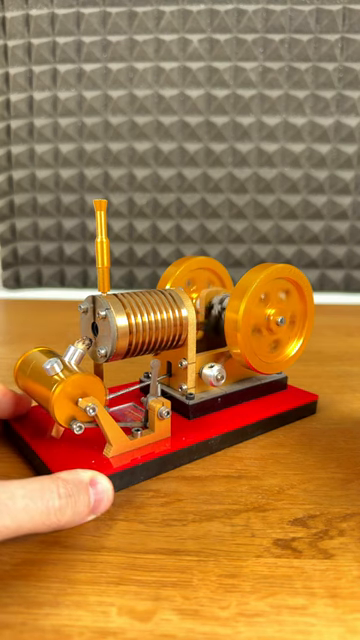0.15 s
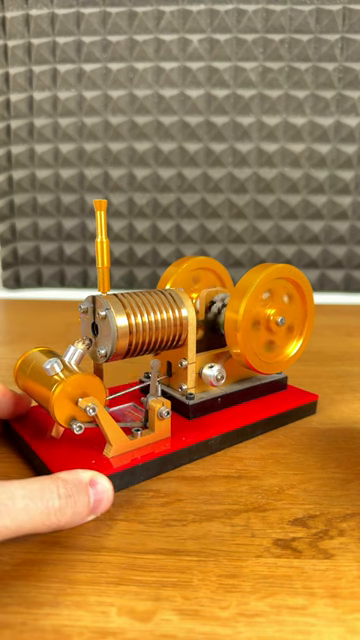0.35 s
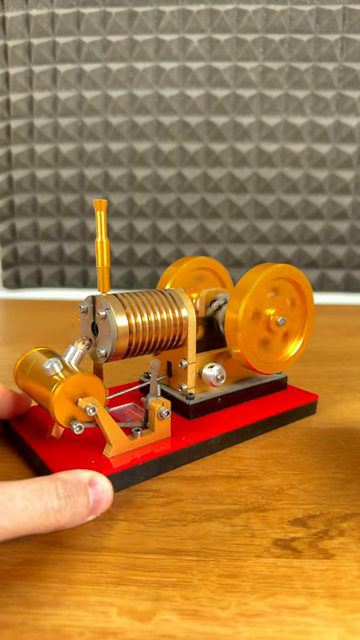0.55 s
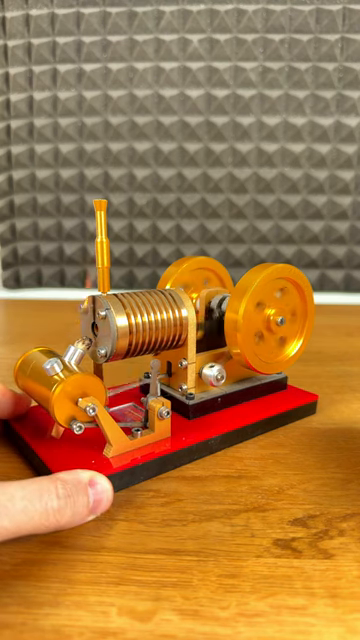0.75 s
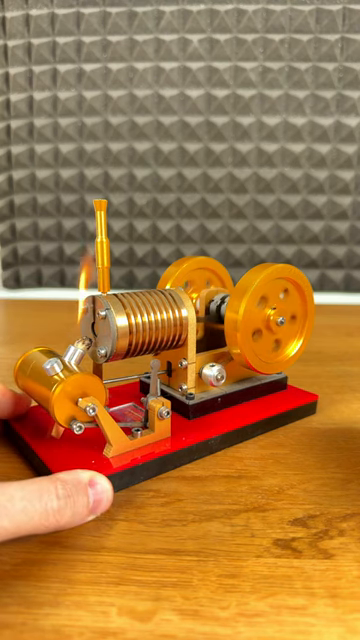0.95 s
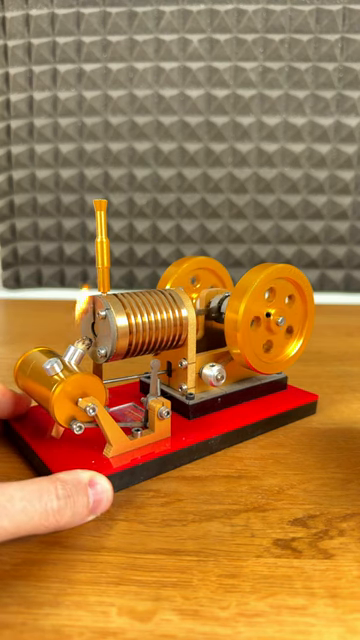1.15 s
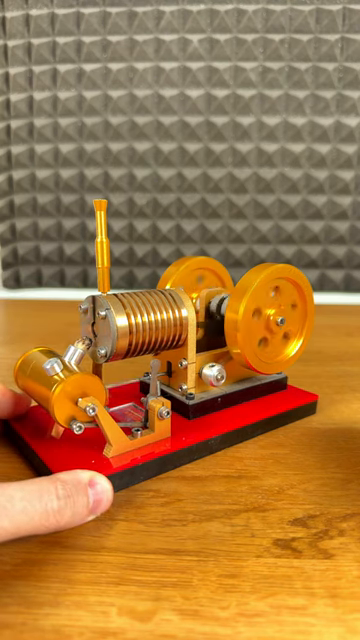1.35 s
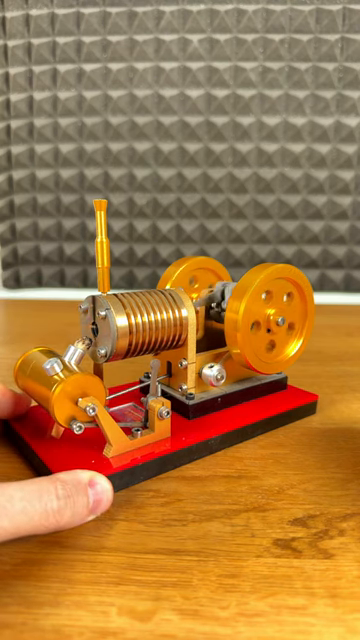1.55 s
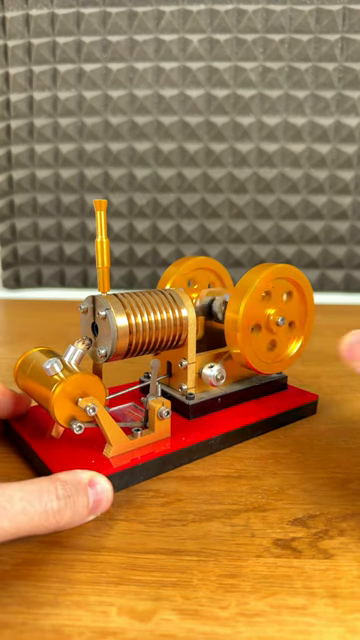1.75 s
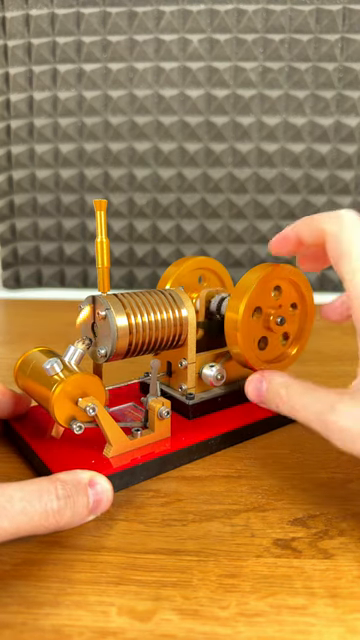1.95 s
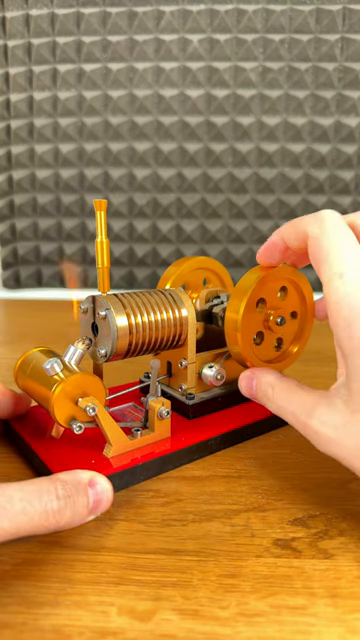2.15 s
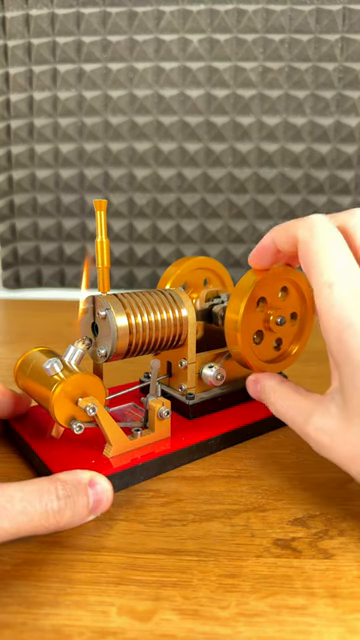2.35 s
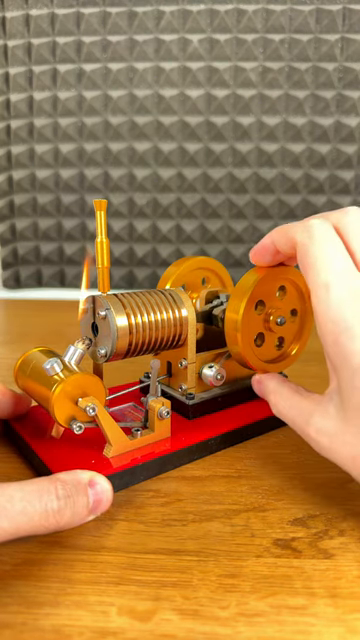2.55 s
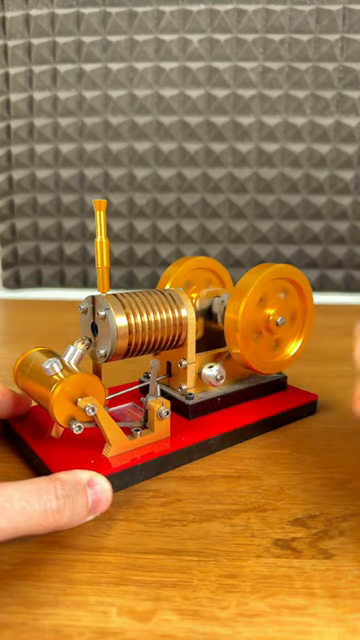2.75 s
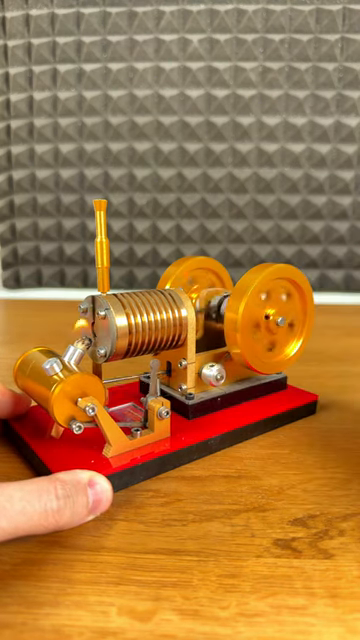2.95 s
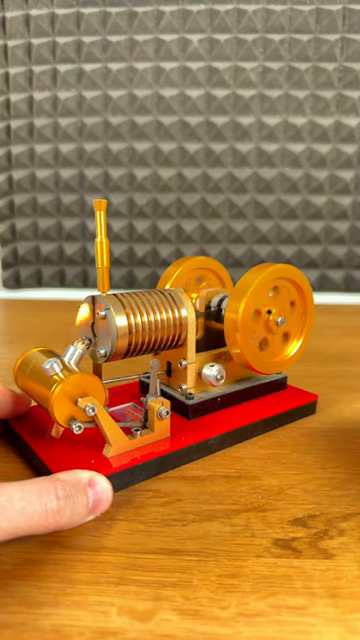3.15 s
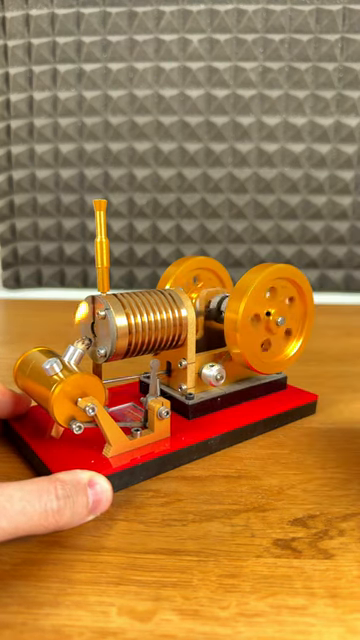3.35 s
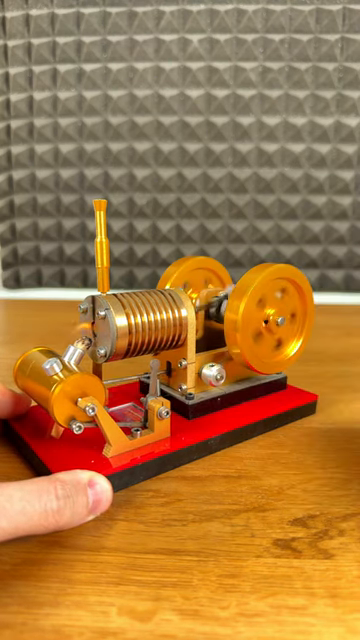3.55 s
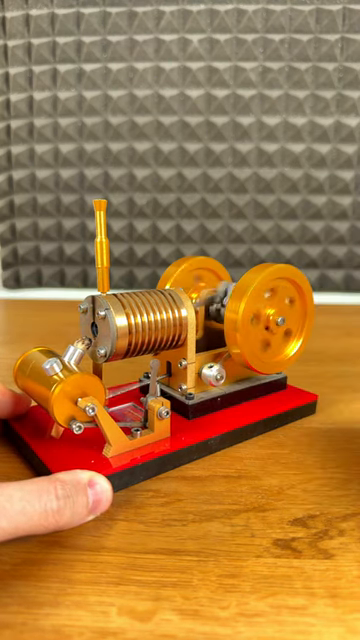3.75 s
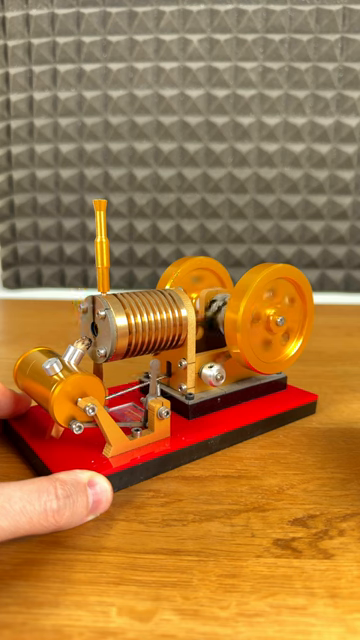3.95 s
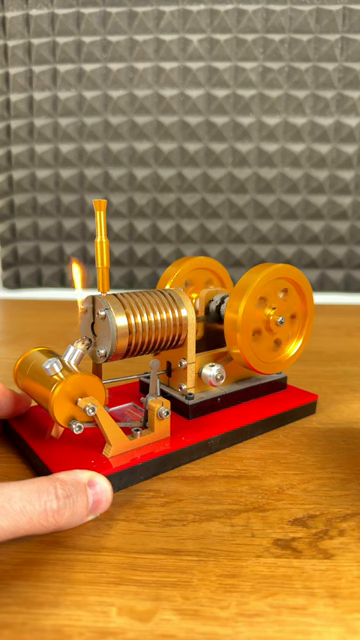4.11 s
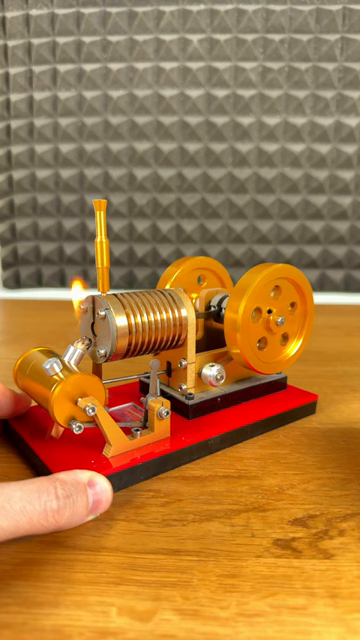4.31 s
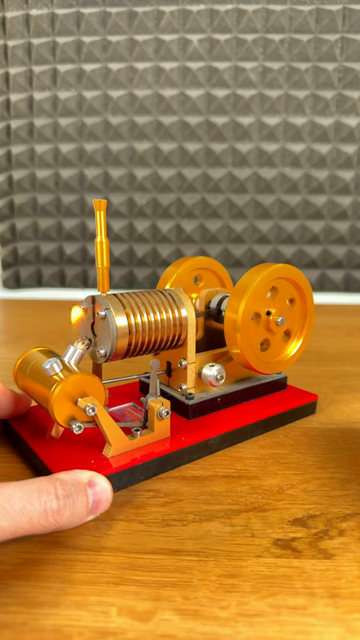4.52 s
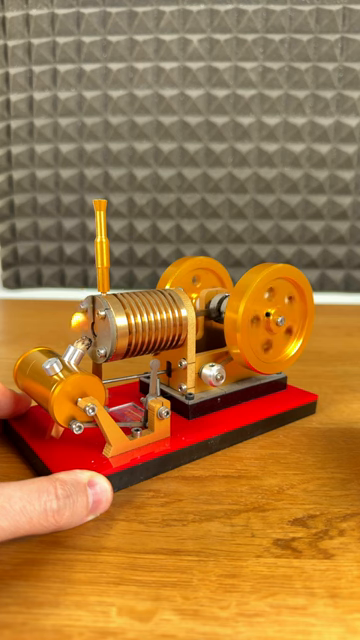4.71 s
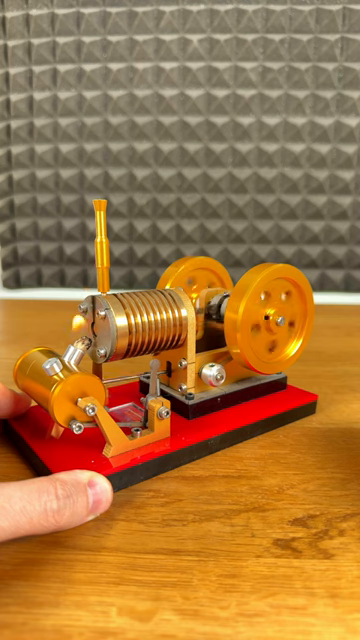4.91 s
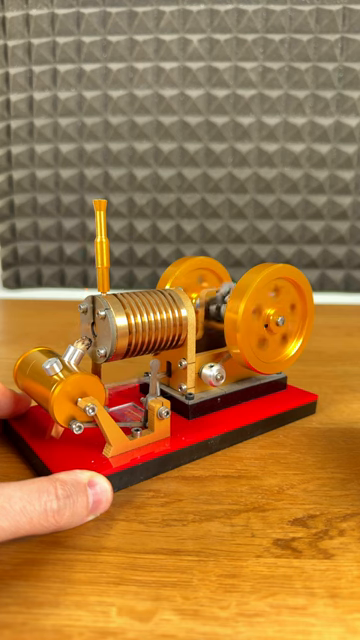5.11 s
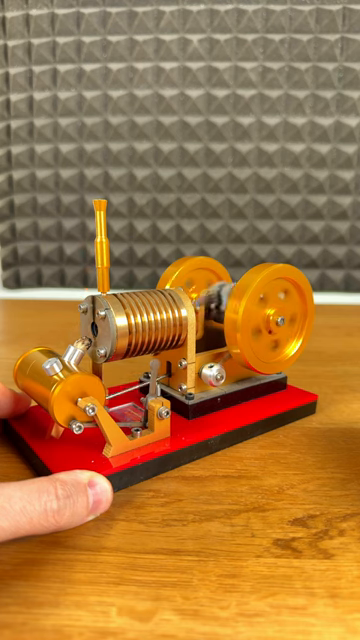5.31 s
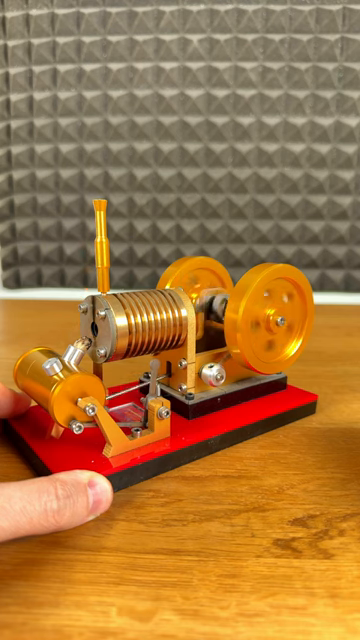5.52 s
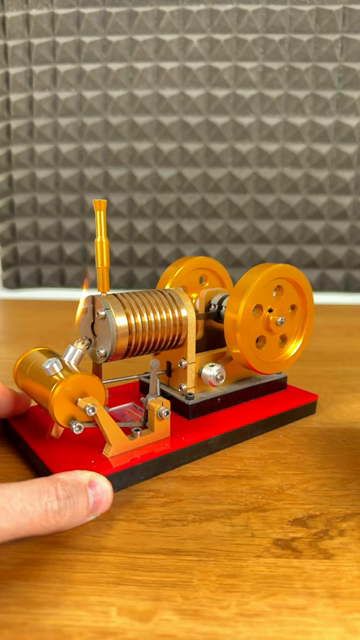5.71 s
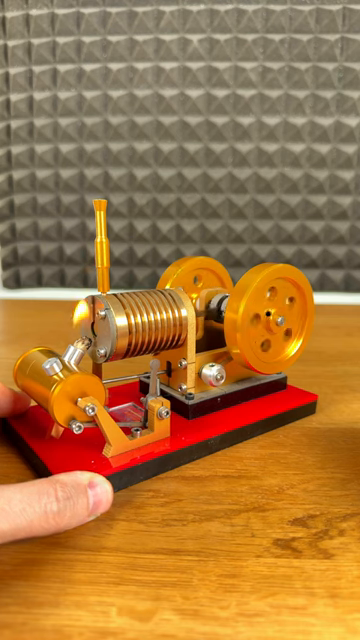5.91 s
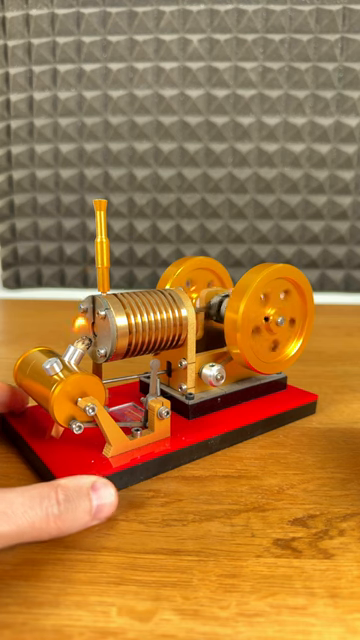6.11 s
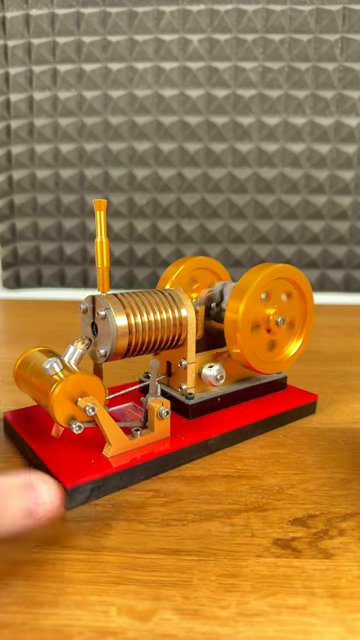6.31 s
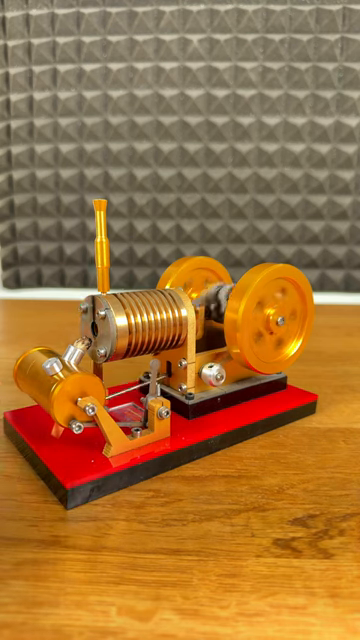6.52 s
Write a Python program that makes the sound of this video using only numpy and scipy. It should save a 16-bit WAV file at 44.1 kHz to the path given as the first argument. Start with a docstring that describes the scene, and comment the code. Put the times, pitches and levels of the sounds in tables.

```python
"""A small flame-licker model engine on a wooden table slows down, close to the microphone in a damped room.
Each powered turn gives a deep knock, a hollow clack and a chink of loose metal linkage, over gritty rubbing.
Four unpowered turns knock twice, the clack later in each of three and almost gone in the last; fingers stop it.
A hand flicks the flywheel, the linkage rattles, and it clacks on at about four and a half turns a second.
Blows ring damped modes, contacts are coloured impulses or noise bursts, and rubbing is modulated noise."""
import sys
import numpy as np
from scipy import signal
from scipy.fft import rfft, irfft
from scipy.io import wavfile
from scipy.ndimage import uniform_filter1d

SR = 44100
rng = np.random.default_rng(int(sys.argv[2]) if len(sys.argv) > 2 else 0)


def output_pcm(signal):
    """Save a mono or channel-first signal as 16-bit PCM at the path in sys.argv[1].

    Samples are clipped to [-1, 1] before scaling.
    """
    pcm = np.clip(np.atleast_2d(signal).T, -1, 1) * 32767
    wavfile.write(sys.argv[1], SR, np.round(pcm).astype(np.int16))


N = 294147
TIME = np.arange(N) / SR  # s
FLICK_S = 2.6686  # the hand restarts the wheel

# Modes of frame, base plate and table. Each row: frequency in Hz, t60 in seconds,
# relative level in dB under a knock, relative level in dB under a clack.
BODY = [(162, .17, -29, -35), (221, .13, -23, -33), (315, .2, -14, -16.5), (357, .09, -19, -13),
        (404, .16, -10.3, -15), (505, .075, -15, -23), (568, .11, -13, -13), (688, .06, -15, -16),
        (807, .1, -14.5, -17), (936, .07, -11, -19), (1110, .05, -16, -24), (1259, .05, -20, -22),
        (1380, .07, -23, -24), (1462, .04, -24, -8), (1722, .035, -25, -6), (1851, .05, -17, -12),
        (2034, .04, -22, -8), (2732, .22, -33, -38), (2890, .05, -25, -35), (3835, .05, -32, -39)]
# Powered turns, each opening with the piston's knock. Each row: start in seconds, length of the stroke
# in seconds, relative levels in dB of the knock and of the table thud, where the slide catches as a share
# of the stroke, relative levels in dB of the catch, the rattle and the spring.
TURNS = [(0.0203, .086, -9.5, -30, 0.83, -23, -18, -61), (0.1752, 0.09, -14.5, -25, 0.55, -22.5, -22, -68),
         (0.367, 0.095, -12.5, -28, 0.56, -16.5, -21.5, -66), (.558, .1, -14, -22.5, 0.86, -31, -20.5, -50),
         (0.78, 0.1, -13.5, -23, 0.5, -39, -19.5, -48.5), (1.0108, 0.11, -12.5, -25, .55, -37, -19, -52),
         (2.7578, 0.07, -12, -20, .55, -28, -13, -70), (2.8746, .096, -11.5, -32, .58, -13, -18.5, -67),
         (3.0464, .095, -12, -24.5, 0.67, -17.5, -18.5, -68),
         (3.234, .102, -12, -25, 0.58, -16, -19.5, -50), (3.4756, 0.099, -10.5, -26, .6, -27, -19.5, -66),
         (3.6924, 0.1, -10.5, -24, 0.6, -17, -19.5, -70),
         (3.9624, 0.099, -9.5, -25, 0.58, -22.5, -20.5, -70), (4.178, 0.1, -11, -23, 0.47, -27, -19.5, -68),
         (4.4094, 0.099, -10, -26, 0.55, -21, -20, -62), (4.6157, 0.098, -9.5, -33, 0.57, -15.5, -17, -46),
         (4.8275, .1005, -10.5, -25, .547, -11.5, -18.5, -58),
         (5.0533, 0.1, -10.5, -27, 0.56, -15.5, -18.5, -53),
         (5.2753, 0.1, -10, -26, 0.56, -15.5, -17.5, -50), (5.4998, 0.11, -11, -26.5, 0.69, -19, -19, -52),
         (5.8041, .1003, -10, -23, 0.94, -24, -20.5, -49.5),
         (6.0332, 0.1, -10.5, -21.5, .55, -37, -21.5, -60),
         (6.2719, 0.099, -10, -25.5, .555, -32, -19.5, -48),
         (6.4814, 0.1, -11.5, -19.5, 0.9, -17, -23.5, -70)]
# Unpowered turns as it runs down: the piston knocks twice; the valve drops later in each of the first
# three turns and hardly sounds in the last.
# Each row: start in seconds, relative levels in dB of the knock and of the table thud, delay of the
# rebound in seconds, its relative level in dB, delay of the valve in seconds, its relative level in dB.
COASTING = [(1.2581, -13, -13.5, .0041, -32.5, .068, -16), (1.442, -24, -18, .008, -17, .0758, -20.5),
            (1.6703, -18.5, -15, 0.011, -24.5, .1476, -26.5), (1.99, -33, -31, 0.011, -21.5, 0.01, -57)]


def from_db(db):
    """Level to amplitude: 20 dB is a factor of ten."""
    return 10 ** (np.asarray(db) / 20)


def unit_energy(x):
    """Normalisation: the squared samples sum to one."""
    return x / np.sqrt(np.sum(x ** 2) + 1e-20)


def at_hz(points, hz, axis=1):
    """Interpolation over log frequency: reads one column of a table."""
    points = np.array(points)
    log_hz = np.log(np.maximum(hz, 1))
    return np.interp(log_hz, np.log(points[:, 0]), points[:, axis])


def through(x, response):
    """Linear superposition: convolves a signal with an impulse response."""
    return signal.oaconvolve(x, response)[:N]


def colour(points, size=4096):
    """Minimum phase: folding the cepstrum gives a causal response of the given spectral shape."""
    hz = np.arange(size // 2 + 1) * SR / size
    bass_cut = np.clip(hz / points[0][0], 1e-2, 1) ** 2
    gain = from_db(at_hz(points, hz)) * bass_cut
    cepstrum = irfft(np.log(gain))
    cepstrum[1:size // 2] *= 2
    cepstrum[size // 2 + 1:] = 0
    return unit_energy(irfft(np.exp(rfft(cepstrum))))


def clicks(times, levels_db):
    """Impulsive excitation: one single-sample impulse for each contact."""
    out = np.zeros(N)
    samples = np.round(np.asarray(times) * SR).astype(int)
    out[np.clip(samples, 0, N - 1)] = from_db(levels_db)
    return out


def chatter(times, levels_db, decay_s, size=900):
    """Contact chatter: metal meets metal in a quickly dying noise burst of tiny bounces, new each time."""
    out = np.zeros(N + size)
    age = TIME[:size]
    envelope = np.sqrt(age) * np.exp(-age / decay_s)
    for s, db in zip(times, levels_db):
        start = max(0, int(s * SR))
        grains = rng.standard_normal(size)
        out[start:start + size] += from_db(db) * unit_energy(grains * envelope)
    return out[:N]


def ring(force, hz, t60):
    """Damped resonance: a unit impulse starts one mode, a dying cosine of height 1."""
    radius = from_db(-60 / (t60 * SR))  # decay per sample
    angle = 2 * np.pi * hz / SR
    zeros = [1, -radius * np.cos(angle)]
    poles = [1, -2 * radius * np.cos(angle), radius * radius]
    return signal.lfilter(zeros, poles, force + 1e-18)  # the offset avoids denormals


def struck(times, levels_db, modes, vary_db):
    """Modal superposition: every blow excites each mode with a slightly different strength."""
    out = np.zeros(N)
    for hz, t60, db in modes:
        variation = vary_db * rng.standard_normal(len(times))
        out += ring(clicks(times, levels_db + db + variation), hz, t60)
    return out


def soften(x, hz):
    """Contact duration: a blow that lasts a while excites little treble, hence a low-pass."""
    return signal.sosfilt(signal.butter(2, min(hz, .45 * SR), fs=SR, output="sos"), x)


def disperse(x, hz, count):
    """Dispersion: bending waves are slower the lower they are, so a blow arrives as a falling chirp."""
    k = np.tan(np.pi * hz / SR)
    pole = (1 - k) / (1 + k)
    allpasses = np.tile([-pole, 1, 0, 1, -pole, 0], (count, 1))
    return signal.sosfilt(allpasses, x + 1e-18)


def each_stroke(pattern, level_db, spread_db):
    """Periodic mechanism: repeats contacts in every powered turn, stretched to its stroke; (times, levels)."""
    s, stroke = np.transpose(TURNS)[:2]
    share, db = np.transpose(pattern)
    times = s[:, None] + stroke[:, None] * share
    levels = np.reshape(level_db, (-1, 1)) + db + spread_db * rng.standard_normal(times.shape)
    return times.ravel(), levels.ravel()


def swell(times, levels_db):
    """Amplitude envelope: a gain that follows a curve in dB and is silent outside it."""
    gain = np.zeros(N)
    span = slice(*np.searchsorted(TIME, [times[0], times[-1]]))
    gain[span] = from_db(np.interp(TIME[span], times, levels_db))
    return gain


def background(level_db=-78):
    """Stationary noise: white noise coloured into a very quiet floor."""
    # Spectrum of the floor. Each row: frequency in Hz, relative level in dB per Hz.
    floor_colour = [(30, -10), (70, -1), (130, -9.5), (200, 2), (500, -15), (2000, -24), (16000, -33.5)]
    return from_db(level_db) * through(rng.standard_normal(N), colour(floor_colour))


def rubbing(stroke_db=-43.5, usual_stroke_s=.1, db_per_speed_doubling=17.5, flick_db=-45, size=40):
    """Sliding friction: gritty noise of piston and slide swells in each stroke, louder in fast strokes."""
    # Swell within a stroke. Each row: share of the stroke, relative level in dB.
    stroke_rub = [(-.3, -27), (0, -4), (.28, -6.5), (.66, 0.5), (1.06, -10.5), (1.36, -12.5), (2.1, -25.5)]
    # Rubbing as the wheel runs down. Each row: time in seconds, relative level in dB.
    coast_rub = [(1.258, -56), (1.33, -55), (1.42, -62.5), (1.55, -59), (1.62, -49.5), (1.72, -57.5),
                 (1.88, -70), (1.94, -63), (2.25, -90)]
    # Spectrum of the rubbing. Each row: frequency in Hz, relative level in dB per Hz.
    rub_colour = [(300, 6.5), (1500, 5.5), (3400, -4), (7500, -9), (10000, -10), (12500, -7.5),
                  (16000, -15.5)]
    share, shape_db = np.transpose(stroke_rub)
    # the flick drags the piston until the first turn after it
    restart_s = min(s for s, *_ in TURNS if s > FLICK_S)
    gain = swell(*np.transpose(coast_rub)) + swell([FLICK_S, restart_s], [flick_db, flick_db])
    for s, stroke, *_ in TURNS:
        speed_db = db_per_speed_doubling * np.log2(usual_stroke_s / stroke)
        gain = np.maximum(gain, swell(s + share * stroke, stroke_db + speed_db + shape_db))
    # grit: the level wanders at random, with a new value every `size` samples
    grid = np.arange(N // size + 2)
    grit_db = np.interp(np.arange(N) / size, grid, rng.normal(0, 3, len(grid)))
    return through(gain * from_db(grit_db) * rng.standard_normal(N), colour(rub_colour))


def linkage(slap_db=17.5, tick_db=13.0, rattle_db=16.5, ring_db=-2.5):
    """Impact-driven resonance: slaps, ticks and rattles of the steel parts all set the metal ringing."""
    # Thin ticks of cam and valve slide. Each row: share of the stroke, relative level in dB.
    stroke_ticks = [(-.138, -29.5), (.21, -42.5), (.413, -29.5), (.48, -33.5), (.635, -30.5), (.755, -37)]
    # The slide ticks on its own while the wheel is slow. Each row: time in seconds, relative level in dB.
    slow_ticks = [(1.244, -25.5), (1.2562, -13), (1.3224, -27), (1.4723, -25), (1.5732, -25), (1.6237, -24),
                  (1.6705, -13), (1.984, -28)]
    # The metal slap trails the knock, less so in a fast stroke.
    # Each row: length of the stroke in seconds, delay in seconds.
    slap_delay = [(.088, .0017), (.095, .004), (.102, .0048)]
    # The linkage lands just before the stroke ends.
    # Each row: share of the stroke, level in dB against the turn's rattle.
    stroke_landing = [(.93, -5)]
    # Then it rattles and bounces. Each row: share of the stroke, level in dB against the turn's rattle.
    stroke_rattle = [(.997, 1.5), (1.045, -8)]
    # Slack linkage in the run-down and under the flick. Each row: time in seconds, relative level in dB.
    slack_rattles = [(1.259, -23), (1.378, -29.5), (1.5307, -24), (1.795, -34), (1.943, -40), (2.68, -35.5),
                     (2.6996, -22), (2.7107, -13), (2.715, -14.5), (2.7185, -15.5)]
    # Spectra of the three contacts. Each row: frequency in Hz, relative level in dB per Hz.
    slap_colour = [(200, -9.5), (900, -3.5), (1850, 1.5), (2300, -15.5), (2850, -1.5), (4700, -5),
                   (5400, -9), (6000, -8.5), (8000, -13.5), (10000, -23.5), (12400, -13.5), (16000, -19.5)]
    tick_colour = [(400, 8), (2000, -19), (4500, -15.5), (5800, -15.5), (7700, -16.5), (9300, -14),
                   (10500, -6.5), (12500, -7), (13800, -10.5), (15000, -5.5), (16000, -19.5)]
    rattle_colour = [(120, 4.5), (300, 10.5), (1000, 7), (1700, 10.5), (2400, -3), (3500, 4.5),
                     (4500, -5.5), (6000, 1), (8200, -7.5), (10000, 0), (12300, 2.5), (13700, 2),
                     (16000, -10)]
    # Modes of cylinder, rods and flywheels. Each row: frequency in Hz, t60 in seconds, relative level in dB.
    metal = [(3371, .11, -25), (6055, .08, -28), (8395, .16, -30), (8402, .62, -48), (9300, .03, -19),
             (11380, .03, -18), (12460, .035, -17), (12815, .07, -26), (14560, .07, -30)]
    s, stroke, _, _, catch_share, catch, rattle, _ = np.transpose(TURNS)
    coast_s, _, _, delay, rebound = np.transpose(COASTING)[:5]

    cam = each_stroke(stroke_ticks, 0, spread_db=2.2)
    catches = s + catch_share * stroke, catch
    ticks = chatter(*np.hstack([cam, catches, np.transpose(slow_ticks)]), decay_s=0.00068)

    slap_s = s + np.interp(stroke, *np.transpose(slap_delay))
    after_knock = slap_s, -16 + rng.standard_normal(len(s))  # spread of 1 dB
    rebounds = coast_s + delay, rebound - 8.5
    landings = each_stroke(stroke_landing, rattle, spread_db=.7)
    slaps = chatter(*np.hstack([after_knock, rebounds, landings]), decay_s=0.0015)

    stroke_ends = each_stroke(stroke_rattle, rattle, spread_db=.7)
    rattles = chatter(*np.hstack([stroke_ends, np.transpose(slack_rattles)]), decay_s=0.0025)

    out = from_db(slap_db) * through(slaps, colour(slap_colour))
    out += from_db(tick_db) * through(ticks, colour(tick_colour))
    out += from_db(rattle_db) * through(rattles, colour(rattle_colour))
    force = slaps + ticks + rattles
    for hz, t60, db in metal:
        out += from_db(db + ring_db) * ring(force, hz, t60)
    return out


def strikes(level_db=25.5):
    """Hard, short contact: a bright crack of steel on steel as the slide strikes the cylinder."""
    # Hard strikes at the sharpest changes of speed. Each row: time in seconds, relative level in dB.
    hard_strikes = [(0.019, -40), (1.2579, -16), (1.672, -30), (2.8743, -27)]
    # Spectrum of a strike. Each row: frequency in Hz, relative level in dB per Hz.
    strike_colour = [(300, -1), (1200, 5), (1900, 12.5), (2400, -12.5), (3400, -9.5), (5000, -9),
                     (8000, -19.5), (10200, 7), (13000, -13), (16000, -6)]
    cracks = chatter(*np.transpose(hard_strikes), decay_s=0.0013)
    return from_db(level_db) * through(cracks, colour(strike_colour))


def knocks(crack_db=10.5, thud_db=21.0, table_db=-4.5, contact_hz=3000, plate_hz=1500, table_hz=130):
    """Modal excitation: the main blow rings frame and base and heaves the table; gives (ring, impact)."""
    # Modes of the heaving table top. Each row: frequency in Hz, t60 in seconds, relative level in dB.
    table_modes = [(62, .55, -25), (84, .3, -21.5), (134, .16, -19), (163, .15, -13)]
    # Spectra of the crack and the thud. Each row: frequency in Hz, relative level in dB per Hz.
    knock_colour = [(60, -10.5), (200, 0), (500, 7), (1000, 6), (2000, -54.5), (4000, -4.5), (8000, -26.5),
                    (12500, -9), (16000, -41)]
    thud_colour = [(110, -9), (170, 4.5), (240, 0), (340, -3), (600, 2.5), (2000, -53.5)]
    turn_s, _, turn_knock, turn_thud = np.transpose(TURNS)[:4]
    coast_s, coast_knock, coast_thud, delay, rebound = np.transpose(COASTING)[:5]
    s, level = np.hstack([(turn_s, turn_knock), (coast_s, coast_knock), (coast_s + delay, rebound)])
    thud_s, thud = np.hstack([(turn_s, turn_thud), (coast_s, coast_thud)])
    modes = np.array(BODY)[:, :3]
    body = soften(struck(s, level, modes, vary_db=1.6), contact_hz)
    crack = through(clicks(s, level + crack_db), colour(knock_colour))
    push = through(clicks(thud_s, thud + thud_db), colour(thud_colour))
    table = struck(thud_s, thud + table_db, table_modes, vary_db=1)
    impact = crack + push + soften(table, hz=446)
    in_plate = disperse(np.array([body, impact]), plate_hz, count=2)
    return disperse(in_plate, table_hz, count=4)


def clacks(ring_db=-8.5, crack_db=16.5, contact_hz=3000, longest_bounce_s=0.012, bounce_db=-9.0, plate_hz=800):
    """Selective modal excitation: the valve lands, and bounces once, with its own balance of body modes."""
    # Spectrum of the crack. Each row: frequency in Hz, relative level in dB per Hz.
    clack_colour = [(200, -36.5), (600, 16.5), (1100, -11.5), (1700, 10), (2400, -24), (3400, -4),
                    (5000, -22.5), (9000, -25), (12500, -24), (16000, -29.5)]
    coast_s, *_, delay, coast_valve = np.transpose(COASTING)
    # the valve falls back part way through every stroke, and once under the flick
    running = each_stroke([(.411, 0)], -13, spread_db=-0.1)
    flick = [FLICK_S], [-24]
    s, level = np.hstack([running, (coast_s + delay, coast_valve), flick])
    modes = [(hz, t60, db) for hz, t60, _, db in BODY]
    landing = soften(struck(s, level + ring_db, modes, vary_db=5.0), contact_hz)
    bounce_s = longest_bounce_s * rng.uniform(0.77, 1.0, len(s))
    bounces = clicks(s + bounce_s, level + bounce_db)
    crack = from_db(crack_db) * through(clicks(s, level) + bounces, colour(clack_colour))
    return disperse(landing + crack, plate_hz, count=12)


def spring():
    """Beating: struck as the stroke ends, close pairs of modes sing on into the gap between turns."""
    # Modes of the spring. Each row: frequency in Hz, t60 in seconds, relative level in dB.
    spring_modes = [(5840, .25, -6), (5883, .35, -4), (5960, .25, -6), (6010, .3, -5), (6061, .42, -2),
                    (6130, .25, -6), (12705, .25, -5), (12790, .25, -6)]
    s, stroke, *_, level = np.transpose(TURNS)
    return struck(s + stroke, level, spring_modes, vary_db=4.0)


def flywheel():
    """Damped low modes: a finger on the rim makes the wheel hum briefly."""
    # Fingers stop and flick the wheel. Each row: time in seconds, relative level in dB.
    fingers = [(2.003, -28.5), (2.6685, -34.5), (2.76, -50)]
    # Modes of the wheel on its shaft. Each row: frequency in Hz, t60 in seconds, relative level in dB.
    wheel_modes = [(575, .14, -3.5), (650, .1, -3), (737, .2, -14), (1378, .15, -20)]
    return soften(struck(*np.transpose(fingers), wheel_modes, vary_db=4.5), hz=1530)


def room(x, build_s=0.0047, count=18):
    """Diffuse reverberation: a noise tail builds up in milliseconds and decays at a rate set by frequency."""
    # Decay of the room. Each row: frequency in Hz, t60 in seconds, relative level of the reverberation in dB.
    room_decay = [(60, 1, -3.5), (160, 0.47, 1.5), (414, 0.28, -3), (1030, 0.33, -8), (2900, 0.24, -12),
                  (7700, 0.13, -18), (15000, 0.13, -14)]
    age = TIME[:SR * 3 // 4]
    tail = np.zeros(len(age))
    build_up = 1 - np.exp(-(age / build_s) ** 2)
    edges = np.geomspace(45, 17000, count + 1)  # Hz
    for low, high in zip(edges, edges[1:]):
        hz = np.sqrt(low * high)
        band_pass = signal.butter(2, [low, high], "band", fs=SR, output="sos")
        band = signal.sosfilt(band_pass, rng.standard_normal(len(age)))
        fade = from_db(-60 * age / at_hz(room_decay, hz)) * build_up
        # energy in proportion to bandwidth keeps the spectrum even before the room's own level
        band_gain = np.sqrt(2 * (high - low) / SR) * from_db(at_hz(room_decay, hz, axis=2))
        tail += unit_energy(band * fade) * band_gain
    return through(x, tail)


def scene():
    """Direct and reverberant field: engine, room and floor; the frame's ring is heard mostly directly."""
    floor = background()
    frame, impact = knocks()
    contacts = from_db(5.5) * rubbing() + linkage() + strikes() + impact + clacks() + spring() + flywheel()
    frame_in_room = .3
    reverberation = room(contacts + frame_in_room * frame)
    return (frame + contacts + reverberation + floor)[None]


def record(dry, threshold_db=-58, depth_db=8, size=900, cutoff_hz=16100):
    """Band-limiting and expansion: deep bass drops, quiet moments are turned down, the top is cut steeply."""
    x = signal.sosfilt(signal.butter(6, 55, "high", fs=SR, output="sos"), dry)
    level_db = 10 * np.log10(np.maximum(uniform_filter1d(x ** 2, size), 1e-14))
    x = x * from_db(np.clip(level_db - threshold_db, -abs(depth_db), 0))
    return signal.sosfilt(signal.ellip(10, .2, 80, cutoff_hz, fs=SR, output="sos"), x)


dry = scene()
out = record(dry)
output_pcm(out)
```